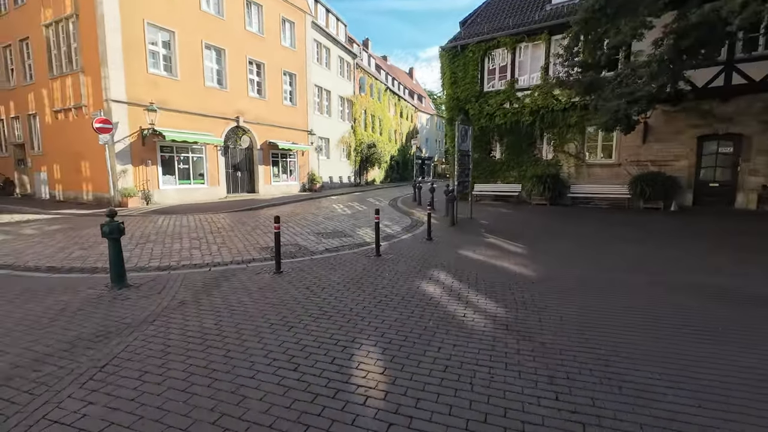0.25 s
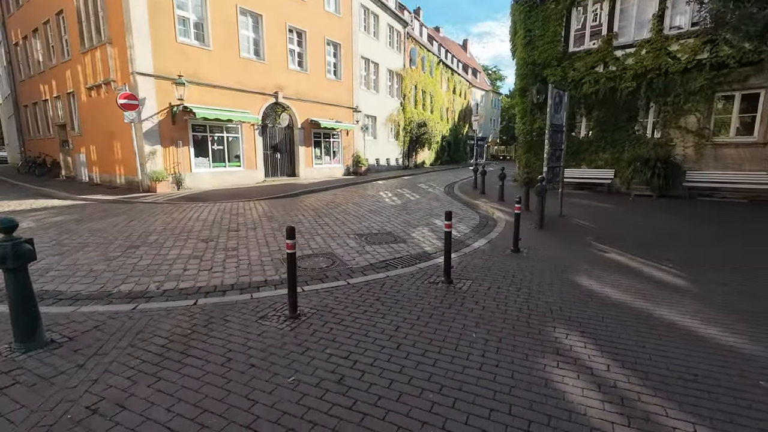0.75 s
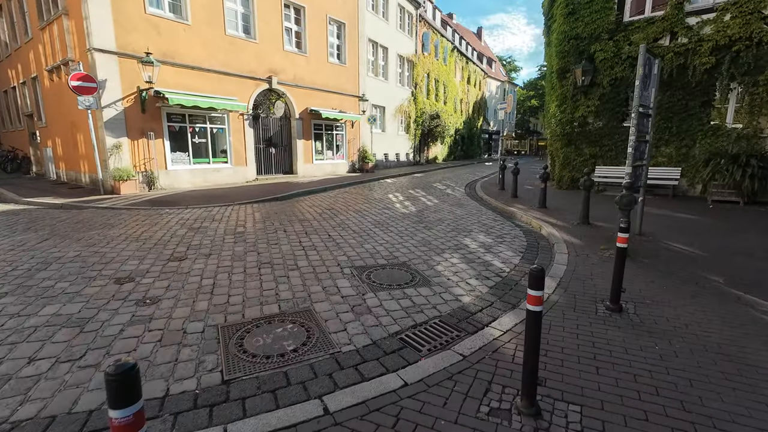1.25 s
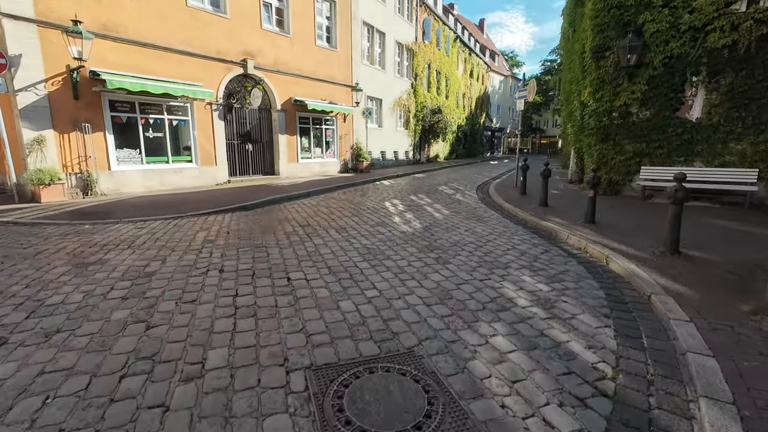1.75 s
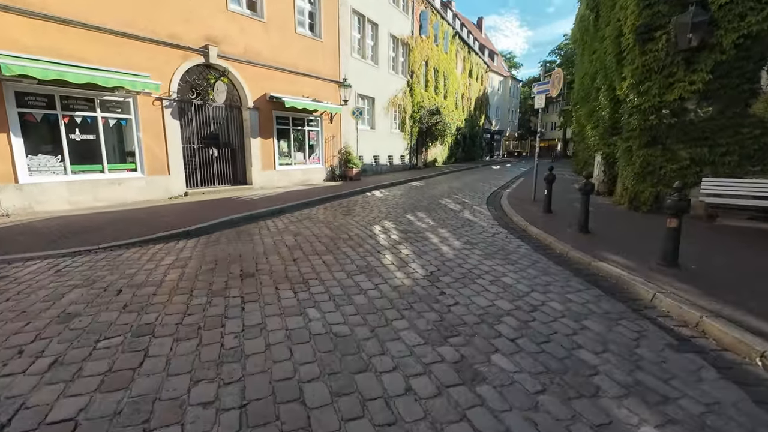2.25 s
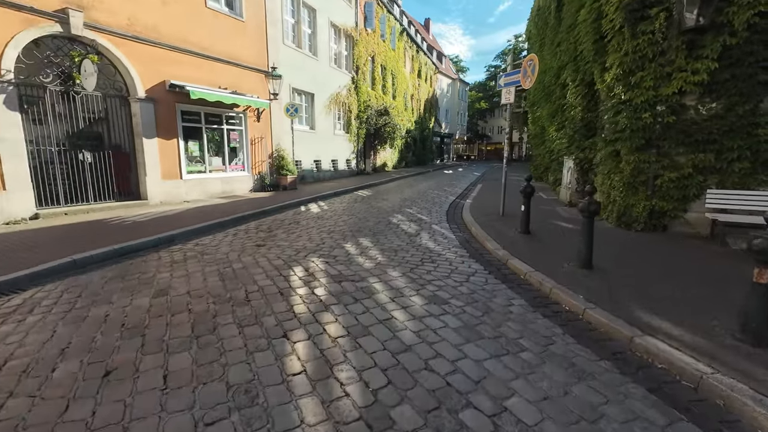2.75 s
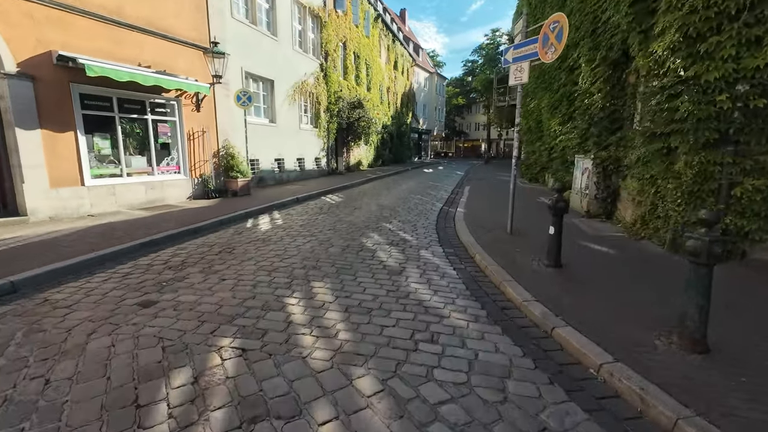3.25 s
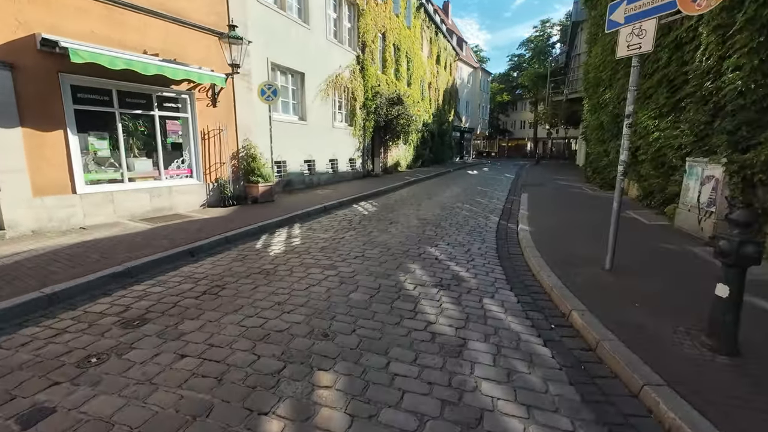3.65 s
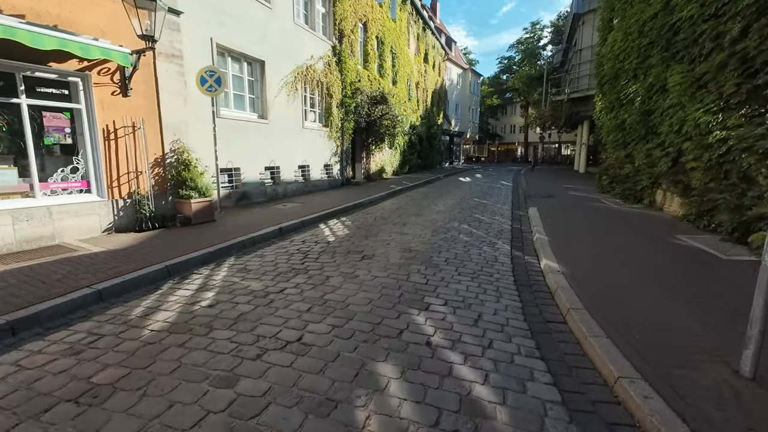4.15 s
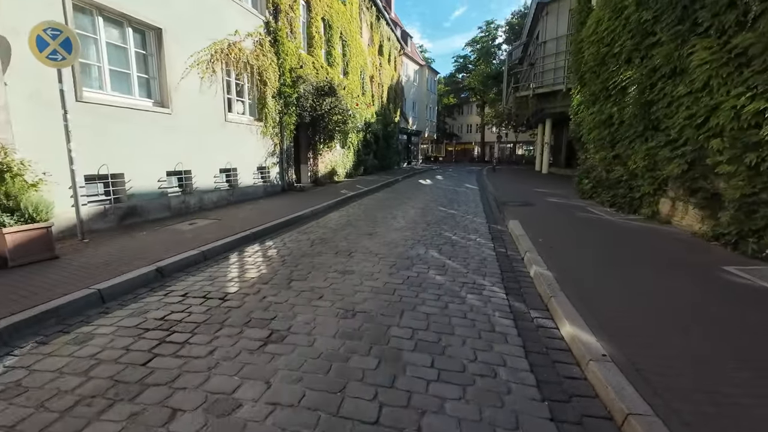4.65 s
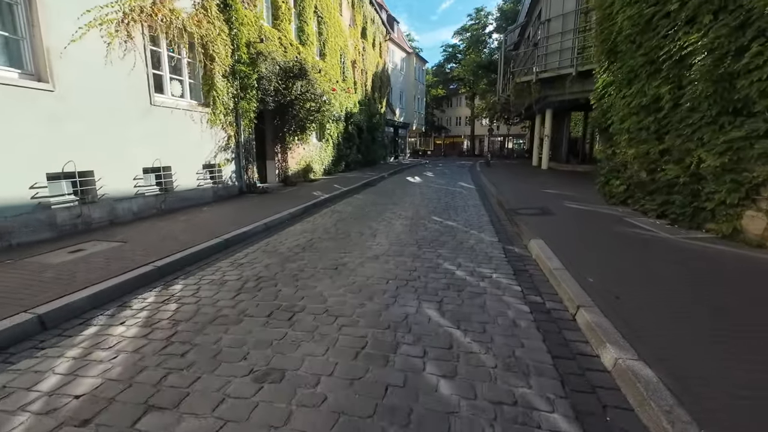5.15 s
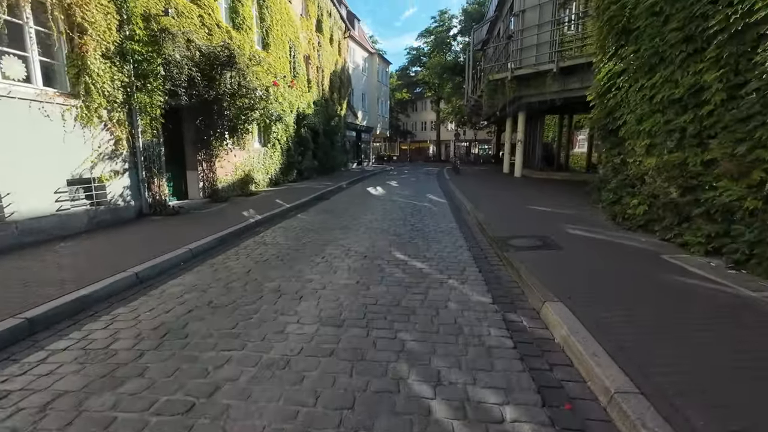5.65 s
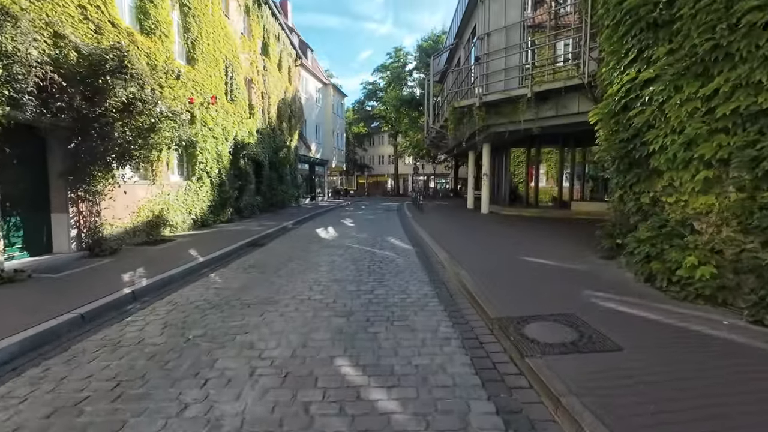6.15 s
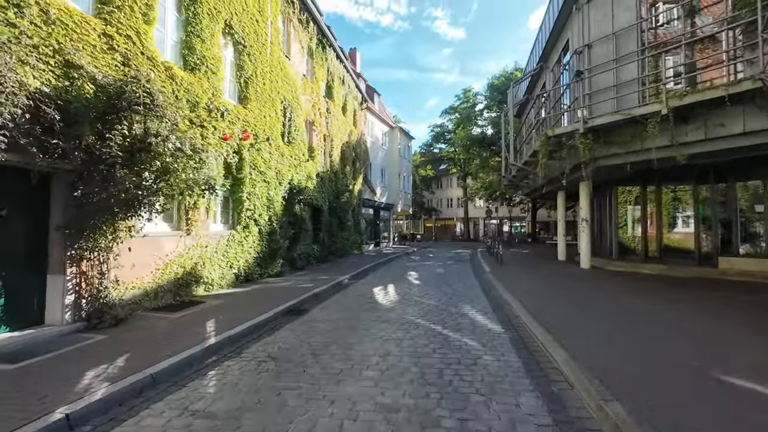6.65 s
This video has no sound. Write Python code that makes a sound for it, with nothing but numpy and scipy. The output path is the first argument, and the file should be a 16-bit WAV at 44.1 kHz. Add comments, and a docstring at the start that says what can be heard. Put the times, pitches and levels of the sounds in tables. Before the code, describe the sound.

A small stereo camera on a bike catches nearly two seconds of quiet rolling, mostly bassy air and a gust leaning left. Then rough stones shake everything: bright, dry, uneven metallic rattles, hollow knocks, clicks and dull frame thuds over a hollow tyre rumble and heavy low buffeting. The rattling thins in the middle, surges close to six seconds and fades back a little. No voices or traffic.

```python
"""A bicycle in a quiet street, heard through the two microphones of a small camera on its bars.
On smooth brick paving: deep air buffeting, a soft tyre roar, lone ticks, a passing hiss and thin whistles.
From 1.78 s on cobblestones: each stone edge shakes loose metal parts into a short rattle, guard and stand
knock, the frame thumps and deep pushes swell over the air; the hardest jolts come around 5.9 to 6.2 s.
Noise rings the parts, panels and frame; the tyres are hollow coloured noise; the pushes are low swings."""
import sys
import numpy as np
from scipy import signal
from scipy.fft import rfft, irfft, next_fast_len
from scipy.io import wavfile
from scipy.ndimage import uniform_filter1d

SR = 44100
rng = np.random.default_rng(int(sys.argv[2]) if len(sys.argv) > 2 else 0)


def generate_wav(sig):
    """Save sig (samples, or channels by samples) to the path in sys.argv[1] as 16-bit PCM at SR."""
    pcm = np.round(np.clip(np.atleast_2d(sig).T, -1, 1) * 32767).astype(np.int16)
    wavfile.write(sys.argv[1], SR, pcm)


N = 303849
T = np.arange(N) / SR
SIDES = np.array([[1], [-1]])  # left, right
COBBLES_S = 1.78  # paving before, cobbles after

# Jolts at stone edges. Each row: start in seconds, relative strength in dB, shake length in ms.
JOLTS = [(1.222, -41.5, 5), (1.764, -29, 5.8), (1.789, -18.5, 7.1), (1.8286, -24, 4.9), (1.8602, -29, 6.1),
         (1.9205, -13.5, 6.2), (1.981, -21, 5.5), (2.021, -28, 6), (2.0412, -12, 9.8), (2.098, -19.5, 10.7),
         (2.211, -31.5, 5), (2.247, -39, 4.5), (2.321, -25, 0.99), (2.356, -33, 3), (2.381, -36, 2.5),
         (2.421, -23, 3.8), (2.445, -39, 3), (2.4606, -30, 6), (2.5, -48, 2.8), (2.5388, -17.5, 9.3),
         (2.5991, -13, 7.9), (2.658, -25, 12), (2.751, -27, 4), (2.823, -29, 4.1), (2.831, -20, 4.1),
         (2.865, -21, 3.9), (2.878, -25, 3), (2.898, -32, 3.9), (2.92, -38, 4), (2.958, -23, 10.5),
         (3.012, -12.5, 7.1), (3.0757, -25, 19), (3.128, -21, 4.5), (3.133, -13.5, 9), (3.179, -25, 8),
         (3.195, -21.5, 6.9), (3.267, -31, 4.4), (3.334, -26, 4.4), (3.3475, -23, 9), (3.378, -32, 4),
         (3.405, -37, 5), (3.4979, -34, 7), (3.528, -39, 5), (3.608, -31.5, 6.9), (3.687, -21, 7.5),
         (3.871, -21, 6.8), (3.9085, -28.5, 5.7), (3.98, -27, 5.5), (3.995, -16, 7.9), (4.055, -14, 4.9),
         (4.372, -28, 8.1), (4.4908, -23, 5.3), (4.5001, -13.5, 3.1), (4.576, -30, 15), (4.763, -24, 6.6),
         (5.007, -23, 8), (5.023, -19, 5.4), (5.061, -17.5, 3.5), (5.0895, -17, 8), (5.227, -27, 8.8),
         (5.349, -23.5, 5), (5.3622, -15.5, 3.3), (5.494, -32, 16), (5.5295, -21.5, 7), (5.615, -31, 3.7),
         (5.755, -33, 3.6), (5.8, -34, 2.8), (5.812, -26, 3), (5.8212, -23, 5.5), (5.8308, -15, 9),
         (5.882, -8.5, 4), (5.9318, -10.5, 6.9), (6.0522, -14.5, 7), (6.108, -10.5, 5.1),
         (6.16, -10.5, 1.6), (6.2194, -19, 7.7), (6.2956, -17, 6.4), (6.366, -18.5, 5.2), (6.438, -16, 2.9),
         (6.515, -22.5, 6), (6.575, -22, 9.8), (6.667, -38, 8.1), (6.74, -46, 2.6), (6.801, -29, 6),
         (6.812, -24, 5.3), (6.871, -27, 2.9)]
# Thin bright flicks, treble only. Each row: start in seconds, relative strength in dB.
FLICKS = [(1.821, -34), (1.874, -40), (2.455, -33), (2.534, -41), (2.592, -40), (2.806, -48), (2.838, -32),
          (2.916, -41), (2.925, -45), (2.945, -44), (3.3357, -42), (3.4031, -42), (3.53, -61),
          (3.5873, -45), (3.7663, -46), (3.788, -45), (3.8566, -45), (3.883, -42), (3.9329, -48),
          (3.946, -49), (4.1624, -45), (4.2427, -56), (4.2871, -48), (4.307, -46), (4.3644, -45),
          (4.4168, -49), (4.435, -52), (4.6029, -45), (4.614, -48), (4.6533, -46.5), (4.6652, -44),
          (4.7411, -46), (4.8124, -47), (4.8363, -37), (4.8688, -44), (4.879, -48), (4.921, -40),
          (4.9645, -54), (5.1591, -46), (5.166, -42), (5.245, -42), (5.426, -41), (5.488, -36),
          (5.6774, -51), (6.0029, -45), (6.0755, -30), (6.2787, -38), (6.3487, -36), (6.4134, -38),
          (6.4264, -37), (6.5002, -39), (6.5536, -42), (6.6504, -47), (6.7048, -57), (6.7696, -57),
          (6.8534, -50)]
FLICK_MS = 1.5
# Treble of a jolt relative to its strength, for a jolt of -12 dB; harder jolts are brighter.
JOLT_SIZZLE_DB, BRIGHTER_PER_DB = -10.5, 0.78
JOLT_PAN_DB = 0.5  # typical left-right difference
# Ringing modes of the loose parts. Each row: pitch in Hz, width in Hz, relative level in dB.
PART_MODES = [(1620, 110, 0), (4200, 100, -2), (4560, 60, 3), (5230, 90, 3), (5727, 90, 4), (7950, 500, 1),
              (8900, 80, -3), (9350, 180, 0), (9735, 100, 2), (10070, 180, 2), (10520, 120, 0),
              (13010, 110, -1)]
# Spectrum of the rattling parts. Each row: frequency in Hz, relative level in dB per Hz.
RATTLE_SPECTRUM = [(500, -20), (800, 8.5), (1600, -4.5), (2500, 4.5), (4000, 4.5), (5500, 0), (6800, 0.5),
                   (10000, 0), (13500, 4), (15600, -9), (16500, -44)]
PATCHY_DB = 1.7  # spread of the flaring in each register
# Rolling. Each row: time in seconds, relative tyre roar in dB, relative chatter between jolts in dB.
ROLL = [(0, -38, -61), (1.74, -38.5, -62), (1.8, -34, -38.5), (2.0, -37.5, -67), (2.12, -33.5, -41.5),
        (2.2, -36.5, -52), (2.32, -33.5, -55.5), (2.7, -33.5, -51), (2.79, -35.5, -56), (2.87, -31.5, -41),
        (3.13, -32, -66), (3.38, -35, -41), (3.5, -37, -53), (4.03, -34.5, -51), (4.35, -35, -57),
        (5.12, -34.5, -47), (5.3, -34, -52.5), (5.74, -36, -57), (5.91, -29.5, -32), (6.2, -31, -41.5),
        (6.6, -35.5, -44.5), (6.89, -36, -52.5)]
# Relative beds at a chatter of -50 dB, and their rise in dB per dB of chatter.
CLATTER_DB, CLATTER_FOLLOWS = -50, 0.54
SIZZLE_BED_DB, SIZZLE_FOLLOWS = -64, 1
CHATTER_BED_DB = -18  # trim of the chatter bed
# Duller knocks of guard and stand.
# Each row: start in seconds, level in dB, panel number from 0, length in ms.
KNOCKS = [(1.776, -41, 1, 15), (1.82, -46, 1, 21), (2.029, -35, 2, 33), (2.055, -26.5, 0, 22),
          (2.6, -36, 4, 6.2), (4.053, -53, 3, 6.5), (2.119, -37, 3, 9.4), (2.217, -35.5, 3, 9.6),
          (2.381, -37.5, 2, 18), (2.424, -23.5, 4, 2.5), (2.461, -26, 4, 4.8), (2.824, -35, 4, 31),
          (2.866, -38, 1, 19), (2.958, -38, 1, 6), (3.004, -26, 1, 5), (3.085, -36, 2, 6.3),
          (3.115, -25, 0, 9.1), (3.135, -31.5, 2, 14), (3.184, -27, 2, 5), (3.336, -36, 2, 14),
          (3.352, -34.5, 0, 36), (3.375, -31, 1, 10), (3.687, -42, 4, 13), (4.5, -38, 4, 13),
          (4.762, -32.5, 1, 10), (5.009, -35.5, 1, 7.8), (5.062, -34, 1, 6.9), (5.531, -33.5, 0, 8.8),
          (5.586, -41, 0, 47), (5.812, -36, 1, 7.4), (5.855, -40, 1, 21), (5.874, -30, 4, 4.4),
          (5.907, -34, 1, 5.9), (5.976, -35, 2, 6.6), (6.002, -34, 2, 34), (6.144, -29.5, 0, 7.9),
          (6.241, -35, 1, 7.9), (6.167, -31.5, 1, 10), (6.296, -49, 4, 11), (6.362, -38.5, 1, 110),
          (6.403, -37.5, 2, 53), (6.826, -31.5, 3, 5.4)]
# Where the panels of guard and stand ring, by panel number: pitch in Hz.
PANELS_HZ = [735, 1067, 1550, 1910, 2810]
# Single dry ticks of small parts and grit. Each row: start in seconds, level in dB, centre in Hz.
TICKS = [(.094, -49, 2400), (.13, -48, 3600), (.19, -61, 8500), (.263, -65, 3000), (.43, -56, 7500),
         (.556, -67, 5500), (.724, -60, 2400), (.912, -56, 2400), (1.002, -52, 11500), (1.15, -58, 3400),
         (1.224, -44, 11500), (1.314, -58, 5000), (1.652, -68, 12500), (1.74, -43, 3600),
         (2.247, -40, 3500), (2.305, -34, 2820), (2.321, -28, 3280), (2.372, -22, 2800), (2.392, -27, 2900),
         (2.531, -27, 2500), (2.706, -33, 3000), (2.718, -28.5, 3380), (2.756, -47, 2200),
         (2.846, -27, 5200), (2.879, -25, 3540), (3.005, -21, 4440), (3.105, -30, 4500), (3.232, -43, 1500),
         (3.266, -42, 3520), (4.305, -36, 4000), (4.68, -33, 1500), (5.165, -47, 4300), (5.412, -43, 3400),
         (5.585, -25, 2880), (5.76, -38, 4800), (5.796, -42, 4000), (5.812, -29, 3500), (5.92, -36, 3100),
         (5.964, -40, 3000), (5.98, -40, 3000)]
TICK_MS, TICK_Q = 1, 5.1
# Blows through the frame.
# Each row: start in seconds, level in dB before the fade, pitch in Hz, 60 dB fade time in ms.
THUMPS = [(1.774, -27, 405, 74), (2.047, -19, 290, 110), (2.063, -25, 328, 150), (2.389, -21, 540, 58),
          (2.815, -18.5, 122, 35), (3.018, -22.5, 347, 34), (3.11, -26, 256, 280), (3.184, -22.5, 514, 100),
          (3.36, -19, 163, 350), (3.433, -29, 161, 170), (3.555, -27, 129.5, 140), (3.719, -27, 120, 100),
          (4.641, -28.5, 170, 75), (4.773, -25, 140, 47), (4.84, -20.5, 140, 45), (4.953, -22.5, 152, 36),
          (5.089, -29, 221, 190), (5.375, -30, 330, 60), (6.139, -11.5, 150, 80), (6.355, -23.5, 256, 92),
          (6.515, -24, 127, 63), (6.78, -33, 314, 110)]
# Hollow tones within the tyre roar. Each row: pitch in Hz, width in Hz, relative level in dB.
TREAD = [(318, 44, -2), (433, 116, -10.5), (580, 46, 4), (786, 28, -3.5), (1343, 75, -7), (1620, 110, -5.5),
         (2140, 120, 0), (2640, 130, -2)]
# Spectrum of the tyre roar. Each row: frequency in Hz, relative level in dB per Hz.
ROAR_SPECTRUM = [(120, -42), (170, -15), (240, -9.5), (320, -5.5), (420, -8), (600, -15), (900, -18),
                 (1300, -24.5), (2000, -32.5), (2800, -35.5), (3500, -41.5), (5000, -45.5), (7000, -53.5),
                 (10000, -55.5), (15000, -63)]
TYRES_WIDER_DB = 2.5
# Steady buffeting between the pushes.
# Each row: time in seconds, level in dB before the waver, upper edge relative to that in dB.
BUFFET = [(0.0, -32, -3), (0.25, -39, -8.5), (0.55, -46, -8), (1.3, -37.5, -18), (1.7, -31.5, -15.5),
          (1.85, -16.5, -21), (1.96, -31, -18), (2.05, -23, -10), (2.12, -24, -13), (2.82, -25.5, -17.5),
          (3.51, -15.5, -10.5), (3.72, -24, -20), (3.95, -26.5, -15), (4.11, -29.5, -16),
          (4.28, -26.5, -19), (4.47, -31.5, -22), (4.59, -25, -12.5), (5.01, -25.5, -14.5),
          (5.2, -21.5, -20.5), (5.35, -18, -21.5), (5.95, -17.5, -21), (6.04, -19.5, -9), (6.3, -23, -8.5),
          (6.89, -25, -16)]
BUFFET_WAVER_DB = 4.0  # spread on the cobbles
PAVING_WAVER = .4  # share of the waver left on the paving
# Strongest deep pushes; those in the first 0.2 s stay silent.
# Each row: crest in seconds, peak level in dB, time from crest to 1/e in ms, pitch in Hz.
PUSHES = [(0.03, -31, 25, 55), (0.095, -26, 25, 62), (0.22, -29.5, 25, 22.1), (0.295, -36, 19, 48.4),
          (0.93, -31, 48, 30.36), (1.869, -9.5, 35, 34), (2.04, -14, 18, 27.0), (2.181, -15, 11, 33.0),
          (2.272, -36, 12, 23.3), (2.349, -7, 17.5, 26.0), (2.48, -14.5, 33, 24.0), (2.669, -18, 23, 33.4),
          (2.816, -16, 15, 26.0), (2.867, -17, 58, 23.0), (3.009, -14.5, 18, 33.24), (3.084, -24, 17, 34.1),
          (3.165, -27, 25, 29.2), (3.3, -16, 18, 29.9), (3.339, -5.5, 14.6, 45.94),
          (3.379, -3, 10.7, 59.05), (3.488, -10, 13, 39.6), (3.577, -10.5, 23, 31.2),
          (3.632, -11, 9.6, 29.84), (3.708, -14, 19, 34.3), (3.781, -16.5, 12.0, 49.0),
          (3.839, -14, 16, 51.0), (4.016, -10.5, 13, 61.2), (4.263, -13, 14, 36.96),
          (4.346, -14.5, 17, 23.24), (4.651, -17.5, 22, 29.85), (4.729, -15, 12, 29.2),
          (4.782, -17.5, 19, 54.1), (4.868, -17, 58, 35.4), (4.958, -8.5, 12, 33.53),
          (5.095, -5, 28.4, 22.94), (5.345, -16, 13, 63.4), (5.406, -13, 8.9, 31.2),
          (5.481, -15.5, 39, 35.0), (5.517, -20, 28, 28.9), (5.586, -13, 29, 31.05),
          (5.678, -11.5, 23, 31.0), (5.908, -16.5, 54, 40.3), (5.975, -15, 9.3, 37.7),
          (6.021, -18.5, 18, 47.3), (6.12, -16, 41, 28.03), (6.149, -1, 6.8, 48.6), (6.19, -9, 50, 26.07),
          (6.261, -5, 38, 20.77), (6.429, -11, 12.6, 55.9), (6.599, -23, 21, 34.65),
          (6.867, -16, 13.4, 43.2)]
PUSH_EDGE_DB, EDGE_DB_PER_OCTAVE = -23.5, 14.5  # rough edge of a 30 Hz push; quicker ones have more
# Gusts with unshared eddies; the one from 0.6 to 1.9 s leans left.
# Each row: start in seconds, end in seconds, lean to the left from -1 to 1,
# relative level of unshared eddies in dB.
GUSTS = [(.12, .6, 0, -2), (.6, 1.9, .55, -2), (1.98, 2.03, .05, -3), (4.52, 4.63, .05, 0),
         (6.12, 6.18, .15, -5)]
GUST_RAMP_MS = 25
EDDY_EDGE_DB, EDDIES_SHARPEN_S = -6, 1.6  # the eddies' upper edge is softer until this time
# Spectrum of the buffeting air. Each row: frequency in Hz, relative level in dB per Hz.
AIR_SPECTRUM = [(2.9, -33), (5.0, 2.5), (16, 9), (29, -4.5), (66, -7.5), (113, -23.5), (200, -34.5),
                (260, -31.5), (440, -120)]
# A faint thin hiss that passes. Each row: time in seconds, lower band in dB, upper band in dB.
HISS = [(0.82, -93, -100), (0.916, -66, -78), (0.96, -72, -82), (1.008, -68, -68), (1.199, -84, -77)]
# The two hiss bands, lower first. Each row: centre in Hz, width in Hz.
HISS_BANDS = [(4950, 620), (12900, 3200)]
# Thin gliding whistles. Each row: start in seconds, end in seconds, first pitch in Hz,
# middle pitch in Hz, last pitch in Hz, level in dB before the flutter.
WHISTLES = [(.86, 1.13, 4930, 4950, 4930, -73), (1.04, 1.14, 4400, 4330, 4270, -76),
            (1.0, 1.24, 8800, 12700, 10300, -82), (1.22, 1.35, 10500, 10400, 9200, -84),
            (1.03, 1.23, 12900, 14200, 11600, -85), (5.64, 5.7, 750, 700, 660, -48)]
# Stereo width: nearly mono in the bass, wide in the treble.
# Each row: frequency in Hz, side relative to mid in dB.
WIDTH = [(200, -34.5), (500, -29), (900, -25.5), (1290, -23.5), (2380, -19.5), (4400, -9.5), (8120, -2.5),
         (15000, 2)]
# Tone balance of the two channels. Each row: frequency in Hz, left minus right in dB.
TILT = [(1500, 0), (2380, -0.1), (4400, 3), (8120, -1.5), (15000, -3.5)]
TOP_HZ = 16400  # treble limit of the camera


def rattle(clatter_db, chatter_db, sizzle_db):
    """Loose parts chatter in three registers at every jolt, and more quietly in between."""
    metal = spread(*loose_parts(contacts(scatter_db=4.0, grain=24)))
    middle, sizzle = jolts()
    clatter = small_jolts(rate=70, scatter_db=14.0, decay_ms=10, calm=0.8)
    throb = small_jolts(rate=60, scatter_db=14.0, decay_ms=8, calm=0.75)
    fine = small_jolts(rate=45, scatter_db=29.0, decay_ms=2.5, calm=0.41)
    fine = 0.55 * throb + 0.65 * fine
    # on smooth paving nothing shakes between jolts
    clatter, throb, fine = (T > COBBLES_S) * np.array([clatter, throb, fine])

    def flaring(lo_hz, hi_hz):
        """One register of the metal, flaring on its own."""
        return undb(PATCHY_DB * walk(70)) * register(metal, lo_hz, hi_hz)

    low = flaring(800, 2830)
    mid = 0.5 * (flaring(2650, 5170) + undb(-5.5) * flaring(4660, 7100))
    high = 0.6 * (undb(-1.5) * flaring(4900, 13200) + flaring(10330, 16400))
    low = low * np.hypot(undb(-20.0) * middle, undb(clatter_db) * clatter)
    mid = mid * np.hypot(undb(-11.0) * middle, undb(chatter_db + CHATTER_BED_DB) * throb)
    high = high * np.hypot(undb(1.5) * sizzle, undb(sizzle_db) * fine)
    return low + mid + high


def jolts():
    """Force of each jolt in the middle and top registers, left and right; their powers add."""
    power = np.zeros((2, 2, N + SR))
    t = np.arange(SR // 4) / SR * 1000
    for (s, db, ms), pan in zip(JOLTS, rng.standard_normal((len(JOLTS), 1))):
        level = undb(db + SIDES * JOLT_PAN_DB * pan / 2)
        force = level * shake(t, ms, rise_ms=1.0, tail_ms=55, tail_db=-20.5)
        bright = undb(JOLT_SIZZLE_DB + BRIGHTER_PER_DB * (db + 12))
        add_at(power[0], s, force ** 2)
        add_at(power[1], s, (bright * force) ** 2)
    for s, db in FLICKS:
        flick = undb(db) * shake(t, FLICK_MS, rise_ms=0.62, tail_ms=18, tail_db=-17)
        add_at(power[1], s, flick ** 2)
    return np.sqrt(power[..., :N])


def shake(t, ms, rise_ms, tail_ms, tail_db):
    """Quick start, a short burst of at least 1 ms, a fading tail (t in ms)."""
    burst = np.exp(-(t / max(ms, 1)) ** 1.31)
    tail = undb(tail_db) * np.exp(-t / tail_ms)
    return (1 - np.exp(-t / rise_ms)) * (burst + tail)


def contacts(scatter_db, grain):
    """Dense tiny contacts of uneven size, each size held for a grain of samples."""
    size = undb(scatter_db * np.repeat(rng.uniform(-0.84, 1, N // grain + 1), grain)[:N])
    return unit(size * rng.standard_normal((2, N)))


def loose_parts(clicks):
    """Clicks sound directly and ring the modes of the loose parts, each now more, now less."""
    out = clicks.copy()
    for hz, width, db in PART_MODES:
        out += resonate(clicks * undb(db + 5.0 * walk(45)), hz, hz / width)
    return unit(colour(out, RATTLE_SPECTRUM))


def small_jolts(rate, scatter_db, decay_ms, calm):
    """Lesser stones: random knocks, rate per second, that make a bed of chatter throb."""
    hits = (rng.random(N) < rate / SR) * undb(scatter_db * rng.uniform(-0.22, 1, N))
    fade = np.exp(-1000 / (decay_ms * SR))
    return unit(calm + signal.lfilter([1], [1, -fade], hits))


def beds():
    """Levels of tyre roar, clatter, chatter and sizzle; the three beds rise and fall together."""
    roar_db, chatter_db = curves(ROLL)
    above = chatter_db + 50
    clatter_db = CLATTER_DB + CLATTER_FOLLOWS * above
    sizzle_db = SIZZLE_BED_DB + SIZZLE_FOLLOWS * above
    return roar_db, clatter_db, chatter_db, sizzle_db


def knocks(clatter_db):
    """Each knock rings roughly at the pitch of the panel that it strikes, over a broader thud."""
    out = np.zeros((2, N + SR))
    t = np.arange(SR // 14) / SR * 1000
    placed = [(s, db, PANELS_HZ[int(round(k))], ms) for s, db, k, ms in KNOCKS]
    for s, db, hz, ms in [*placed, *stray_knocks(clatter_db, count=200)]:
        noise = rng.standard_normal((2, len(t)))
        ring = resonate(noise, hz, 9.0)
        thud = resonate(noise, hz, 2.5)
        force = shake(t, ms, rise_ms=1.2, tail_ms=21, tail_db=-17.5)
        add_at(out, s, undb(db) * unit(ring + undb(-8) * thud) * force)
    return spread(*out[:, :N])


def stray_knocks(clatter_db, count):
    """Lesser knocks at random times and spots of the panels, 0 to 9.8 dB above the clatter level."""
    chance = rng.random((count, 4))
    s = COBBLES_S + chance[:, 0] * (N / SR - COBBLES_S)
    db = np.interp(s, T, clatter_db) + 9.8 * chance[:, 1] ** 2
    panel = (chance[:, 2] * len(PANELS_HZ)).astype(int)
    hz = np.array(PANELS_HZ)[panel] * 1.48 ** chance[:, 3]
    return np.c_[s, db, hz, np.full(count, 4.0)]


def ticks(chatter_db, count):
    """Very short clicks, each with its own pitch; many lesser ones come with the chatter."""
    chance = rng.random((count, 3))
    s = COBBLES_S + chance[:, 0] * (N / SR - COBBLES_S - .03)
    db = np.interp(s, T, chatter_db) + 6.0 + 12.0 * chance[:, 1] ** 2
    stray = np.c_[s, db, 1300 * 4.5 ** chance[:, 2]]
    out = np.zeros((2, N + SR))
    t = np.arange(SR // 40) / SR * 1000
    force = shake(t, TICK_MS, rise_ms=1.0, tail_ms=29, tail_db=-22.0)
    for s, db, hz in [*TICKS, *stray]:
        noise = rng.standard_normal((2, len(t)))
        ring = resonate(resonate(noise, hz, TICK_Q), hz, TICK_Q)
        add_at(out, s, undb(db) * unit(ring) * force)
    return spread(*out[:, :N])


def thumps():
    """Blows through the frame: a dull noisy ring, the same left and right."""
    out = np.zeros(N + SR)
    t = np.arange(SR // 4) / SR
    for s, db, hz, t60_ms in THUMPS:
        noise = band(rng.standard_normal(len(t)), 127, 563)
        ring = unit(resonate(noise, hz, 1.2))
        shape = (1 - np.exp(-t / 0.0018)) * np.exp(-np.log(1000) * t * 1000 / t60_ms)
        add_at(out, s, undb(db) * ring * shape)
    return out[:N]


def tyres(roar_db):
    """Rubber on stone: a hollow roar that flickers quickly, under a rush that swells gently."""
    noise = rng.standard_normal((2, N))
    tones = np.zeros((2, N))
    for hz, width, db in TREAD:
        tones += resonate(noise * undb(db + 2.8 * walk(14)), hz, hz / width)
    mid, side = colour(noise + tones, ROAR_SPECTRUM)
    roar = unit(spread(mid, side * undb(TYRES_WIDER_DB)))
    hollow = lowpass(roar, 600, order=1)
    rush = (roar - hollow) * undb(0.7 * walk(13))
    flicker = undb(1.2 * walk(40))
    return (hollow * flicker + rush) * undb(roar_db - 5.5 + 0.67 * walk(7))


def buffet():
    """Deep pushes shared by both microphones; gusts add unshared eddies, and one leans clearly left."""
    bed, swings, edge_gain = pushes()
    lean, share = gusts()
    noise = colour(rng.standard_normal((2, N)), AIR_SPECTRUM)
    deep = steady(unit(lowpass(noise, 70, order=3)), ms=89)
    edge = unit(band(noise, 88.4, 227)) * undb(2.46 * surface_waver() * walk(35))
    softer_db = np.array([[0], [EDDY_EDGE_DB]]) * (T < EDDIES_SHARPEN_S)
    common, own = deep * bed + swings + edge * edge_gain * undb(softer_db)
    return common * (1 + SIDES * lean) + SIDES * share * own


def pushes():
    """A wavering bed for the deep band, single swings on top of it, and the strength of the upper edge."""
    bed_db, edge_db = curves(BUFFET)
    bed = undb(bed_db + BUFFET_WAVER_DB * surface_waver() * walk(18))
    edge_power = (bed * undb(edge_db)) ** 2
    swings = np.zeros((2, N))
    phases = rng.uniform(0, 2 * np.pi, (len(PUSHES), 2, 1))
    for (s, db, ms, hz), phase in zip(PUSHES, phases):
        if s < .2:
            continue
        near = slice(int((s - .2) * SR), int((s + .2) * SR))
        swell = undb(db) * np.exp(-((T[near] - s) * 1000 / ms) ** 2)
        swings[:, near] += swell * np.cos(2 * np.pi * hz * T[near] + phase)
        rough_db = PUSH_EDGE_DB + EDGE_DB_PER_OCTAVE * np.log2(hz / 30)
        edge_power[near] += (swell * undb(rough_db)) ** 2
    return bed, swings, np.sqrt(edge_power)


def surface_waver():
    """Share of the buffeting's waver: small on the paving, full on the cobbles."""
    return np.where(T > COBBLES_S, 1, PAVING_WAVER)


def gusts():
    """Lean to the left and unshared share of the air during each gust."""
    lean, share = np.zeros((2, N))
    for start, end, left, db in GUSTS:
        inside_ms = np.minimum(T - start, end - T) * 1000
        on = np.clip(inside_ms / GUST_RAMP_MS + .5, 0, 1)
        lean = lean + left * on
        share = share + undb(db) * on
    return lean, share


def hiss():
    """Two faint narrow bands of noise that swell and vanish, unrelated left and right."""
    on = (T > HISS[0][0]) & (T < HISS[-1][0])
    out = np.zeros((2, N))
    for db, (hz, width) in zip(curves(HISS), HISS_BANDS):
        noise = band(rng.standard_normal((2, N)), hz - width / 2, hz + width / 2)
        out += on * undb(db) * unit(noise)
    return out


def whistles():
    """Each tone glides along a parabola through its three pitches and flutters in pitch and level."""
    out = np.zeros(N)
    for start, end, first_hz, middle_hz, last_hz, db in WHISTLES:
        u = np.clip((T - start) / (end - start), 0, 1)
        bend = 4 * middle_hz - 2 * first_hz - 2 * last_hz
        hz = first_hz + (last_hz - first_hz) * u + bend * u * (1 - u)
        hz = hz * (1 + .006 * walk(30) + .007 * walk(600))
        swell = np.sqrt(np.sin(np.pi * u) + 1e-12) * (u < 1) * (u > 0)
        out += undb(db + 4.3 * walk(40)) * swell * np.sin(2 * np.pi * np.cumsum(hz) / SR)
    return out


def spread(mid, side):
    """Stereo from mid and side: nearly mono in the bass, wide in the treble, then tilted left to right."""
    left, right = mid + SIDES * colour(side, WIDTH)
    hz, db = np.transpose(TILT)
    return np.array([colour(left, np.c_[hz, db / 2]), colour(right, np.c_[hz, -db / 2])])


def undb(db):
    """Decibels to amplitude."""
    return 10 ** (np.asarray(db) / 20)


def unit(x):
    """Rms 1."""
    return x / np.sqrt(np.mean(x ** 2))


def add_at(out, s, x):
    """Add a sound that starts at s seconds."""
    i = int(s * SR)
    out[..., i:i + x.shape[-1]] += x


def curves(table):
    """Columns of a table at every sample."""
    s, *columns = np.transpose(table)
    return [np.interp(T, s, c) for c in columns]


def walk(rate):
    """Random levels held 1 / rate s and slewed twice; rms 1."""
    k = int(SR / rate)
    steps = np.repeat(rng.standard_normal(N // k + 1), k)
    return unit(uniform_filter1d(uniform_filter1d(steps, k), k)[:N])


def steady(x, ms):
    """Evens out the chance swells of narrow noise by its local power."""
    k = int(ms * SR / 1000)
    power = uniform_filter1d(uniform_filter1d(x ** 2, k), k)
    return x / np.sqrt(power + 0.014)


def gain(points, size):
    """Gain at each rfft bin from (Hz, dB) points, straight lines over log frequency."""
    hz, db = np.transpose(points)
    bins_hz = np.arange(size // 2 + 1) * SR / size + 0.098  # offset avoids log of 0
    return undb(np.interp(np.log(bins_hz), np.log(hz), db))


def colour(x, points):
    """Filter by a (Hz, dB) spectrum."""
    size = next_fast_len(N)
    return irfft(rfft(x, size) * gain(points, size), size)[..., :N]


def resonate(x, hz, q):
    """One resonance at a pitch."""
    return signal.lfilter(*signal.iirpeak(hz, q, SR), x)


def band(x, lo_hz, hi_hz):
    """Band-pass with firm edges."""
    return signal.sosfilt(signal.butter(2, [lo_hz, hi_hz], "band", fs=SR, output="sos"), x)


def lowpass(x, hz, order):
    """Keep what lies below hz."""
    return signal.sosfilt(signal.butter(order, hz, fs=SR, output="sos"), x)


def register(x, lo_hz, hi_hz):
    """One register of a sound, rms 1, with gentle edges and no phase shift."""
    return unit(signal.sosfiltfilt(signal.butter(1, [lo_hz, hi_hz], "band", fs=SR, output="sos"), x))


def scene():
    """Everything reaches the camera from close by."""
    roar_db, clatter_db, chatter_db, sizzle_db = beds()
    shaken = rattle(clatter_db, chatter_db, sizzle_db) + knocks(clatter_db) + ticks(chatter_db, count=500)
    return shaken + thumps() + tyres(roar_db) + buffet() + hiss() + whistles()


def record(dry):
    """The camera softly rounds the loudest peaks and cuts the top."""
    ceiling = .95
    rounded = ceiling * np.tanh(dry / ceiling)
    return signal.sosfilt(signal.ellip(8, .2, 70, TOP_HZ, fs=SR, output="sos"), rounded)


dry = scene()
out = record(dry)
generate_wav(out)
```